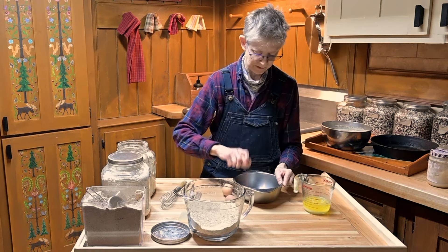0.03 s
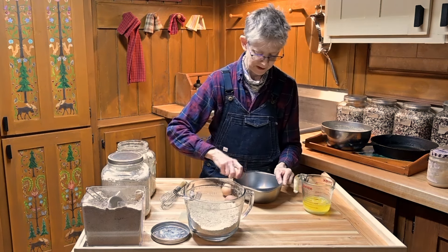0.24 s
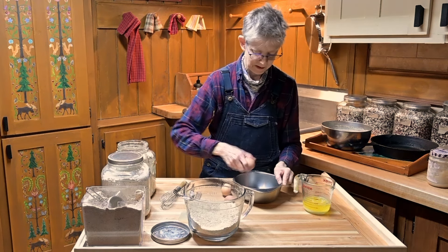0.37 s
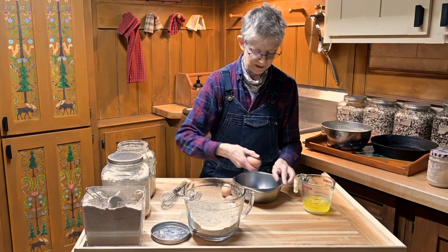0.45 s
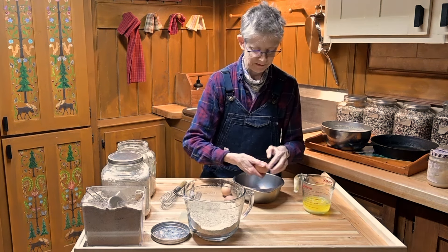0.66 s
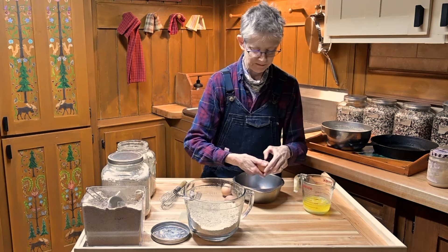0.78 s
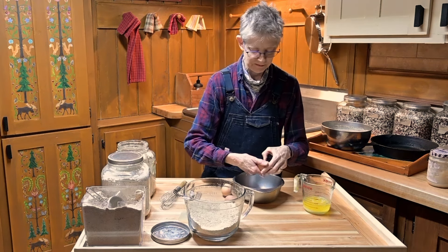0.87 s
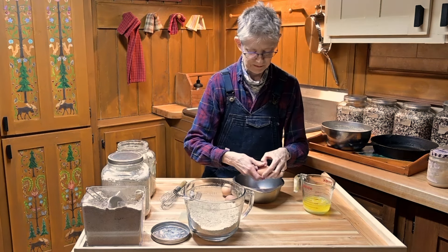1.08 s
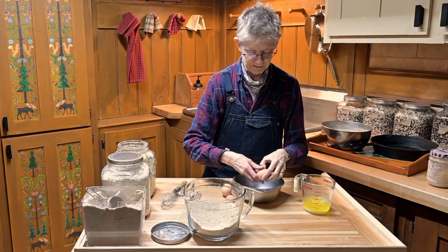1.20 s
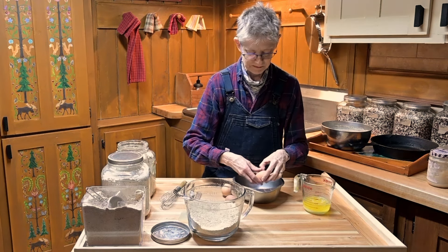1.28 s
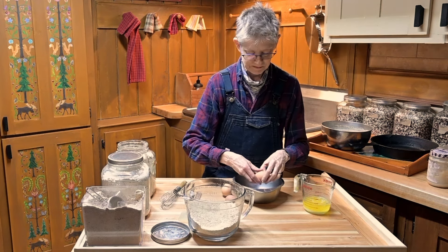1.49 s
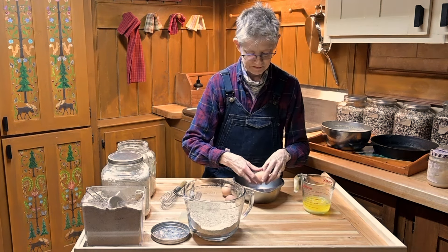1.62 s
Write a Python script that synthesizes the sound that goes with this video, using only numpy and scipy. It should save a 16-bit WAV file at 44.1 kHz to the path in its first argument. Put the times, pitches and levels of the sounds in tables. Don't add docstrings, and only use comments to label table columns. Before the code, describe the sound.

An egg cracks on a steel bowl's rim: after faint bumps and a slight slide from 0.1 s, a loud, overloaded blow lands at 0.22 s, with shattering shell, brief metallic ring and wooden thud and chatter. The ringing fades by about 0.7 s into low room hum. Fingers rustle and shell snaps lightly near 1.02 s, then more crisply at 1.35-1.44 s, with soft knocks. Small kitchen, close microphone.

```python
import sys
import numpy as np
from scipy import signal
from scipy.fft import rfft, irfft
from scipy.io import wavfile

SR = 44100
rng = np.random.default_rng(int(sys.argv[2]) if len(sys.argv) > 2 else 0)


def store_pcm(level_fs):
    pcm = np.round(np.clip(level_fs, -1, 1) * 32767).astype(np.int16)
    wavfile.write(sys.argv[1], SR, np.atleast_2d(pcm).T)


def makeup_ratio(level_db):
    decades = np.asarray(level_db, float) / 20
    return 10 ** decades


N = 72765
T = np.arange(N) / SR

# [t/s, level/dB, burst length/s, share into the bowl/dB]
EGG_BLOWS = [
    (0.2213, -5, .0055, -2),
    (0.23, -14.5, .003, -17.5),
    (0.2718, -30.5, 0.0027, -15),
]


def rms_one(x):
    return x / np.sqrt(np.mean(x ** 2) + 1e-20)


def curve(rows):
    return makeup_ratio(np.interp(T, *np.transpose(rows)))


def at_hz(points, hz, axis=1):
    p = np.array(points)
    return np.interp(np.log(np.maximum(hz, 1)), np.log(p[:, 0]), p[:, axis])


def highpass(x, hz):
    return signal.sosfilt(signal.butter(2, hz, "high", fs=SR, output="sos"), x)


def coloured(points):
    hz = np.fft.rfftfreq(N, 1 / SR)
    spectrum = rfft(rng.standard_normal(N)) * makeup_ratio(at_hz(points, hz)) * (hz > 20)
    return rms_one(irfft(spectrum, N))


def drift(rate_hz):
    r = np.exp(-2 * np.pi * rate_hz / SR)
    slow = signal.lfilter([1], [1, -2 * r, r * r], rng.standard_normal(N + SR))[SR:]
    return rms_one(slow - slow.mean())


def ring(x, hz, t60):
    r = makeup_ratio(-60 / (t60 * SR))
    w = 2 * np.pi * hz / SR
    return signal.lfilter([0, np.sin(w)], [1, -2 * r * np.cos(w), r * r], x + 1e-18)


def body(x, peaks):
    out = 0
    for k, (hz, width, db) in enumerate(peaks):
        r = np.exp(-np.pi * width / SR)
        b = (1 - r * r) / 2 * np.array([1, 0, -1])
        a = [1, -2 * r * np.cos(2 * np.pi * hz / SR), r * r]
        out = out + (-1) ** k * makeup_ratio(db) * signal.lfilter(b, a, x + 1e-18)
    return out


def burst(start, length):
    fractures_per_s = 9000
    t = np.maximum(T - start, 0)
    shape = (1 - np.exp(-t / (.12 * length))) * np.exp(-(t / length) ** 2)
    grains = rng.standard_normal(N) * (1 + (rng.random(N) < fractures_per_s / SR))
    x = shape * grains
    return x / np.abs(x).max()


def click(t, db):
    return (np.arange(N) == int(t * SR)) * makeup_ratio(db)


def room_hum():
    # [f/Hz, density/dB]
    hum_colour = [(30, -28.5), (55, 0), (250, -13), (700, -16), (1700, -25), (5000, -28), (11000, -23.5),
                  (15700, -37)]
    # [t/s, gain/dB]
    gate_ride = [(0, 5), (.6, -1.5), (.645, -5.5), (.71, -7.5), (.75, -3), (1.1, -3.5), (1.3, -4.5),
                 (1.65, -4.5)]
    return makeup_ratio(-64.5) * curve(gate_ride) * coloured(hum_colour)


def slide():
    # [t/s, level/dB]
    slide_level = [(0, -66), (.10, -63), (.135, -44.5), (.21, -49), (.34, -53.5), (.42, -53), (.52, -54),
                   (.6, -60.5), (.66, -79.5)]
    # [f/Hz, width/Hz, level/dB]
    slide_modes = [(120, 120, -2.5), (325.1, 290, 4), (674, 360, -1), (984, 94, 0), (1420, 800, -8),
                   (2940, 220, -6.5), (3300, 200, -9.5), (3600, 340, -7), (5190, 170, -5.5),
                   (10400, 3200, -26)]
    grain = makeup_ratio(drift(60) + 2 * drift(300))
    friction = sum(body(grain * rng.standard_normal(N), [mode]) for mode in slide_modes)
    return curve(slide_level) * rms_one(friction)


def rub():
    # [t/s, level/dB, treble/dB]
    strokes = [(0, -79, -6), (.33, -74, -16), (.4, -53, -5), (.46, -67, -7), (.65, -94, -4),
               (.74, -76, 0.5), (.92, -65, 1), (.97, -57, 4), (1.03, -49.5, -4), (1.07, -53.5, -4.5),
               (1.12, -67, -1), (1.2, -78, 2), (1.352, -81, 6), (1.358, -46.5, 3.5), (1.394, -53, 1.5),
               (1.43, -43, 1.5), (1.491, -62.5, 0), (1.551, -68, 3.5), (1.65, -87.5, 0.5)]
    # [f/Hz, density/dB]
    rustle_colour = [(40, -6.5), (150, -8.5), (585, -4.5), (1200, -12), (2600, -16.5), (7000, -15),
                     (10000, -10), (15700, -15.5)]
    t, db, treble_db = np.transpose(strokes)
    noise = coloured(rustle_colour)
    low = signal.sosfiltfilt(signal.butter(2, 7000, fs=SR, output="sos"), noise)
    mixed = low + (noise - low) * makeup_ratio(np.interp(T, t, treble_db))
    grain = makeup_ratio(drift(40) + drift(360))
    return makeup_ratio(np.interp(T, t, db)) * mixed * grain


def snaps():
    # [t/s, peak level/dB, pitch f/Hz, length/s, crack over ring/dB]
    shell_snaps = [(.081, -56, 6150, 0.0011, -12), (.137, -48.5, 3600, 0.0017, -7.5),
                   (.2734, -16, 9100, .004, -1), (.585, -58, 9000, 0.0011, 2),
                   (.905, -54, 2500, 0.00084, 4), (.9899, -40.5, 3300, 0.00092, -2.5),
                   (1.0194, -30, 11000, .002, 3), (1.021, -32, 3930, .003, 3.5),
                   (1.0225, -32, 8300, 0.0042, 4), (1.0215, -40, 5340, 0.0049, -15),
                   (1.026, -40.5, 750, 0.013, -12.5), (1.030, -40, 11500, 0.00075, 3),
                   (1.0601, -33, 12460, 0.00072, 1), (1.0603, -41, 1197, 0.00079, -9.5),
                   (1.165, -54, 1960, 0.00092, 8), (1.316, -56.5, 8020, 0.0012, -7.5),
                   (1.3542, -28.5, 1430, 0.001, -12.5), (1.3543, -27.5, 2774, 0.0011, -11),
                   (1.3544, -29, 3410, 0.0012, -12.5), (1.3545, -22.5, 9370, .0015, 0.5),
                   (1.3635, -31.5, 5530, .002, 1), (1.374, -44.5, 2500, 0.0025, -3),
                   (1.385, -41, 8500, .0008, -3), (1.3955, -43, 7400, .001, -5),
                   (1.4024, -30.5, 6200, 0.0017, -6.5), (1.4035, -28.5, 8490, 0.0044, 3),
                   (1.4043, -32, 2500, .002, -3), (1.4156, -25, 2660, 0.0024, -4.5),
                   (1.416, -33, 9500, .002, -10), (1.4219, -20, 13760, 0.0026, 0),
                   (1.4225, -30.5, 2500, .003, 1), (1.4262, -27.5, 10430, 0.0011, 0),
                   (1.4355, -28.5, 9980, .0012, -3), (1.42, -40.5, 700, 0.0124, -21.5),
                   (1.436, -47.5, 750, 0.0028, -20), (1.503, -54, 10000, 0.0016, 5),
                   (1.53, -50, 9000, .004, 1), (1.545, -53, 9000, .003, 2), (1.602, -52, 1880, 0.0011, -7),
                   (1.6025, -52.5, 3700, .001, -1), (1.634, -58, 9380, .001, -11)]
    ring_cycles = 4.0
    out = np.zeros(N)
    for t, db, hz, length, crack_db in shell_snaps:
        x = burst(t, length)
        tone = body(ring(x, hz, ring_cycles / hz + .002), [(hz, hz * .8, 0)])
        crack = signal.lfilter(*signal.butter(1, 350, "high", fs=SR), x)
        crack = crack - .6 * body(crack, [(6500, 4000, 0)])
        crack = crack + body(crack, [(2800, 2500, 0)])
        snap = rms_one(tone) + makeup_ratio(crack_db) * rms_one(crack)
        out += makeup_ratio(db) * snap / np.abs(snap).max()
    return out


def knocks():
    # [t/s, peak level/dB, pitch f/Hz, t60/s]
    soft_knocks = [(.112, -45, 900, 0.025), (.1255, -43.5, 820, .02), (.1278, -34, 900, .025),
                   (.1385, -39, 350, 0.051), (.1438, -38.5, 354, 0.061), (.1572, -41, 640, 0.019),
                   (.1785, -32.5, 599.6, 0.013), (1.0225, -30, 410, 0.013), (1.4, -40.5, 520, 0.025)]
    out = np.zeros(N)
    for t, db, hz, t60 in soft_knocks:
        out += body(ring(click(t, db), hz, t60), [(hz, hz, 0)])
    return out


def blows():
    # [f/Hz, width/Hz, level/dB]
    shell_modes = [(1624, 90, 2.5), (2150, 42, 5), (3570, 130, 4.5), (2800, 600, -9), (2500, 410, -13),
                   (6880, 140, -15.5), (9400, 650, 0), (10700, 700, -5), (14400, 1800, -13), (900, 590, -3),
                   (4640, 140, -16.5)]
    # [f/Hz, level/dB, t60/s]
    bowl_modes = [(2318.4, -28, 0.58), (3590, -27.5, .14), (1582, -18.5, 0.11), (1374, -30, 0.31),
                  (3200, -32.5, 0.18), (7390, -28, 0.029), (8100, -33.5, .14), (8960, -14.5, .03),
                  (9940, -25.5, 0.058), (2208, -14.5, 0.12)]
    # [f/Hz, level/dB, t60/s]
    board_modes = [(107.4, -31.5, 0.48), (135.2, -36.5, 0.55), (178.8, -28, 0.32), (223.5, -29, 0.28),
                   (294.8, -14, .15), (410.7, -19, 0.13), (470.4, -22.5, 0.16), (520.5, -29, 0.2),
                   (700, -27, 0.16), (750, -18.5, 0.17), (1147, -26, 0.097), (350, -26.5, 0.12)]
    board_lag_s, board_spread_s = .0044, .0036
    rattle_db, rattle_s = -27.5, .04
    grip = makeup_ratio(-61 * np.maximum(T - .47, 0))

    out = np.zeros(N)
    for t, db, length, bowl_db in EGG_BLOWS:
        out += makeup_ratio(db + 20) * sum(body(burst(t, length), [mode]) for mode in shell_modes)
        tick = click(t + .001, bowl_db)
        out += grip * sum(makeup_ratio(level) * ring(tick, hz, t60) for hz, level, t60 in bowl_modes)
        push = tick + makeup_ratio(bowl_db + rattle_db) * burst(t, rattle_s)
        for hz, level, t60 in board_modes:
            lag_s = board_lag_s + board_spread_s * rng.random()
            late = np.roll(push, int(lag_s * SR))
            out += makeup_ratio(level) * ring(late, hz, t60) * rng.choice([-1, 1])
    return highpass(out, 85)


def splinters():
    level_db, t60_s, grains_per_s = -23, .21, 18000
    t = T - EGG_BLOWS[0][0] - .003
    sizes = makeup_ratio(1.9 * np.minimum(rng.exponential(1, N), 4)) * rng.choice([-1, 1], N)
    grains = sizes * (rng.random(N) < grains_per_s / SR)
    bright = signal.lfilter([1, -.9], [1], grains)
    return rms_one(bright) * (t > 0) * makeup_ratio(level_db - 60 * np.maximum(t, 0) / t60_s)


def lift():
    # [t/s, level/dB]
    lift_level = [(.34, -91), (.39, -56), (.44, -59.5), (.5, -74), (.53, -93.5)]
    # [f/Hz, width/Hz, level/dB]
    rim_modes = [(8600, 60, 0), (9700, 120, -7), (10700, 120, -8), (13200, 150, -10)]
    return curve(lift_level) * rms_one(body(rng.standard_normal(N), rim_modes))


def kitchen(x):
    # [f/Hz, t60/s, level/dB]
    room_decay = [(100, 0.75, -2), (300, 0.51, -10), (990, 0.48, -2.5), (2980, 0.23, -3.5),
                  (7550, 0.35, -3.5), (14200, 0.12, -10)]
    level_db, lag_s = -16, .006
    t = T[:SR * 3 // 4]
    edges = 60 * 2 ** np.arange(0, 8.1, .5)
    tail = 0
    for low, high in zip(edges, edges[1:]):
        hz = np.sqrt(low * high)
        bandpass = signal.butter(2, [low, high], "band", fs=SR, output="sos")
        band = signal.sosfilt(bandpass, rng.standard_normal(len(t)))
        tail = tail + band * makeup_ratio(at_hz(room_decay, hz, axis=2) - 60 * t / at_hz(room_decay, hz))
    tail = tail * np.clip(t / lag_s - .3, 0, 1)
    return makeup_ratio(level_db) * signal.fftconvolve(x, tail / np.sqrt(np.sum(tail ** 2)))[:N]


def scene():
    hit = blows() + splinters()
    crack = snaps() + knocks()
    shut = makeup_ratio(-9 * np.clip((T - .59) / .12, 0, 1))
    wet = shut * kitchen(hit) + makeup_ratio(2) * kitchen(crack)
    return (shut * hit + crack + wet + slide() + rub() + lift() + room_hum())[None]


def top_cut(x):
    return signal.sosfilt(signal.butter(12, 15820, fs=SR, output="sos"), x)


def record(dry):
    x = highpass(dry, 38)
    x = x / (1 + np.abs(x) ** 4) ** .25
    x = signal.sosfilt(signal.cheby2(10, 50, 16700, fs=SR, output="sos"), x)
    return top_cut(x)


dry = scene()
out = record(dry)
store_pcm(out)
```